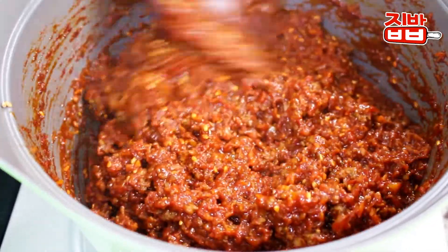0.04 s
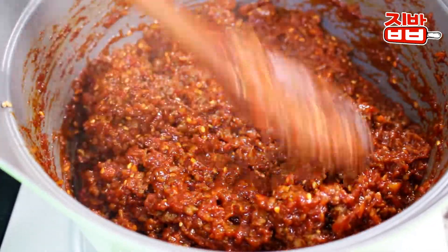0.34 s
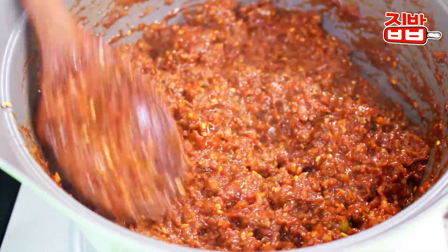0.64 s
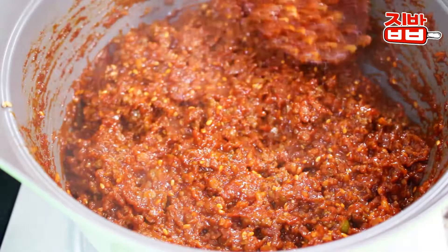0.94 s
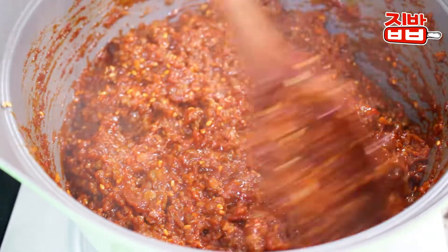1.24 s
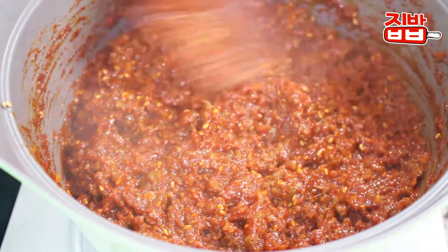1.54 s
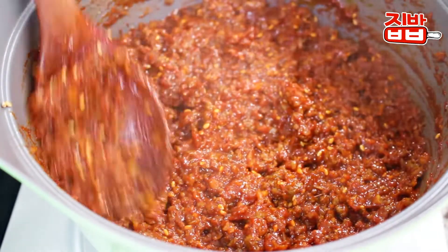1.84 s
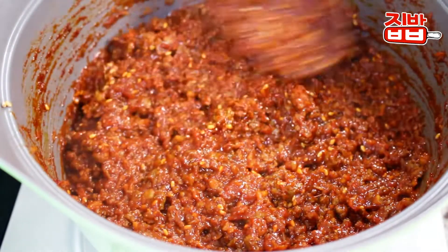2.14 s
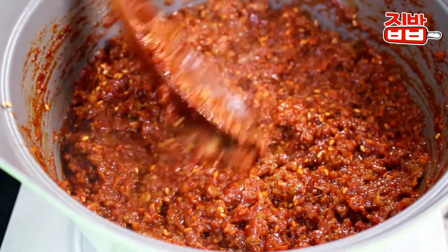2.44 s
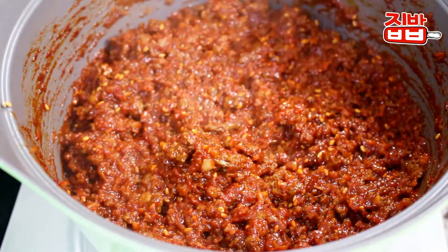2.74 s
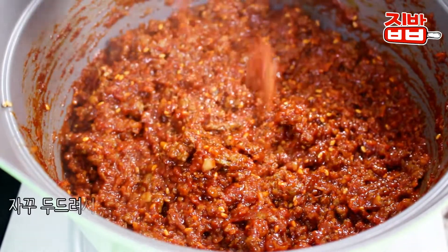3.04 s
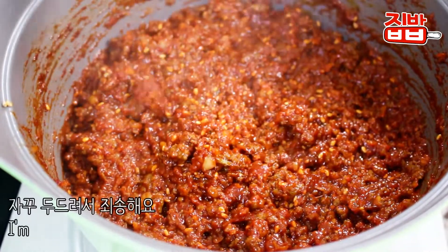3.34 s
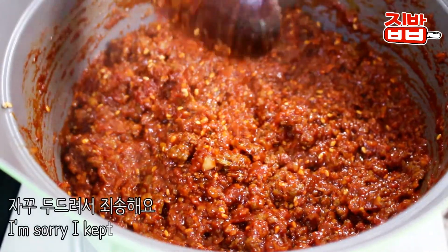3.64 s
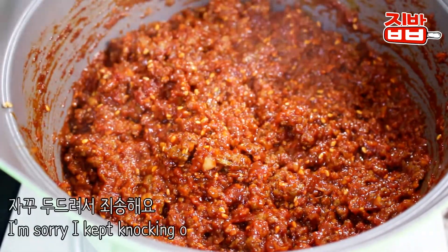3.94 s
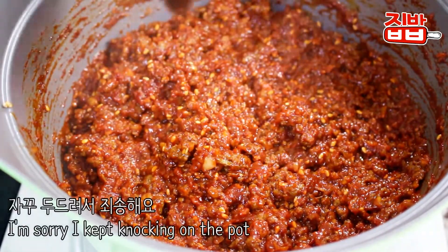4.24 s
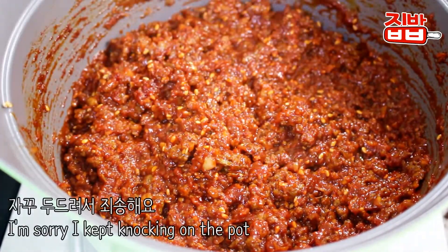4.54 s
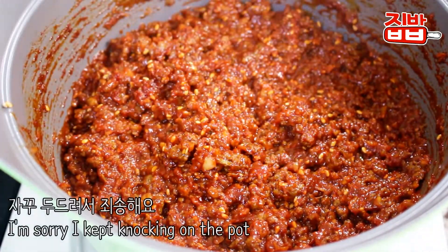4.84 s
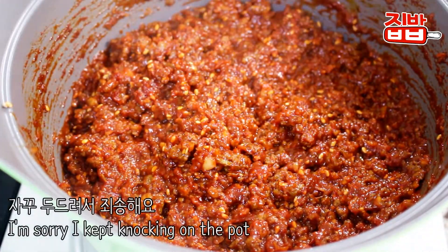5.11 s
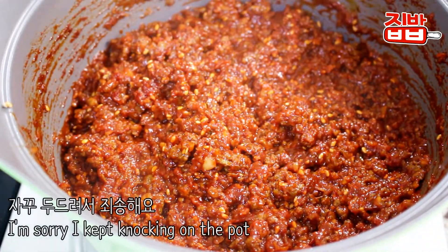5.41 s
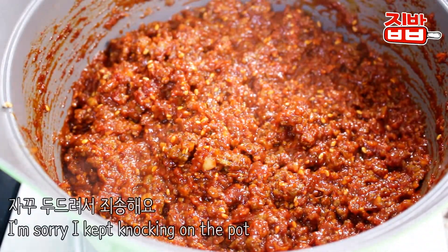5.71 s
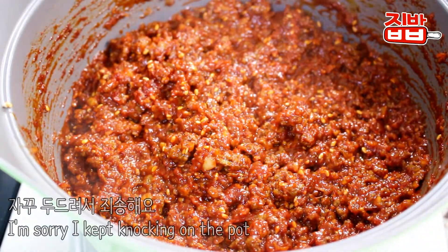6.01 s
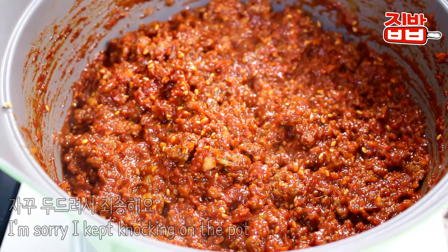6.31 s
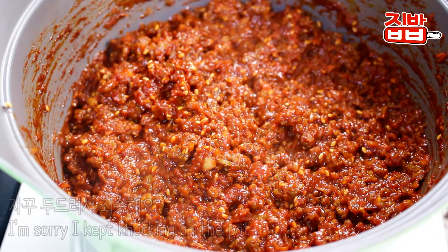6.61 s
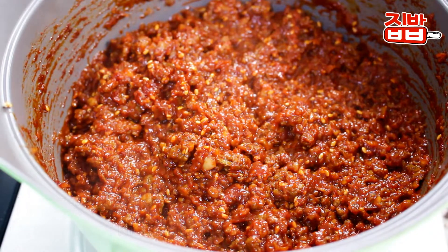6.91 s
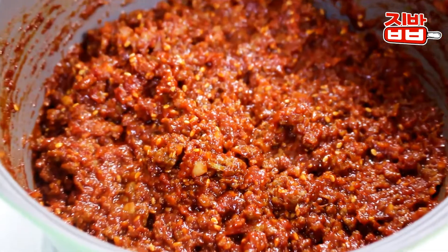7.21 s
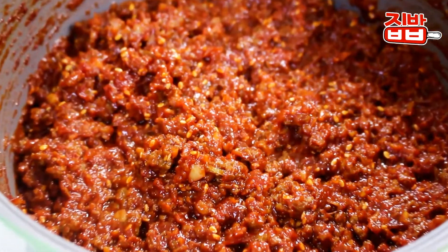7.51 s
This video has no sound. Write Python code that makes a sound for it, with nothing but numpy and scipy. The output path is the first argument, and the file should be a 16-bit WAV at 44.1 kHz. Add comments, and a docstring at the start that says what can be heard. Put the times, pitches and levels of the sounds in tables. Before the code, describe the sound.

Sticky stirring and hard wooden knocks on a metal pot in a kitchen, followed by a clack on a dish and knob clicks.

```python
"""A wooden spatula knocks on a metal pot: it bumps the wall while turning thick chili paste, then is
knocked clean on the rim. The paste crackles and pops; the pot hisses over a fluttering burner.
The spatula is laid on a dish, a stove knob clicks and something thumps near the microphone.
Each blow is a noisy clack plus decaying modes. The kitchen rings after it, over room air and a faint
monitor whine, and the hardest knocks overload the recorder."""
import sys
import numpy as np
from scipy import signal
from scipy.io import wavfile

SR = 44100
rng = np.random.default_rng(int(sys.argv[2]) if len(sys.argv) > 2 else 0)


def digitize_waveform(pressure):
    """Quantize a signal to 16-bit integers and store it at the path in sys.argv[1].

    Rows of a 2-D input are taken as channels; values are limited to [-1, 1].
    """
    field = np.atleast_2d(pressure).T
    bounded = np.clip(field, -1, 1)
    quanta = np.round(bounded * 32767).astype(np.int16)
    wavfile.write(sys.argv[1], SR, quanta)


N = 333396
TIME = np.arange(N) / SR


def amp(db):
    """Decibels to gain."""
    return 10 ** (np.asarray(db) / 20)


def unit_rms(x):
    """Scales to rms 1."""
    return x / np.sqrt(np.mean(x ** 2) + 1e-20)


def lookup(table, hz, column=1):
    """One table column, interpolated over log frequency."""
    columns = np.transpose(table)
    return np.interp(np.log(hz + 1), np.log(columns[0]), columns[column])


def add(mix, start_s, sound):
    """Mixes a sound in at start_s."""
    part = mix[max(round(start_s * SR), 0):][:len(sound)]
    part += sound[:len(part)]


def colour(x, db_at, size=4096):
    """Minimum-phase filter with gain db_at(hz)."""
    hz = abs(np.fft.fftfreq(size, 1 / SR))
    log_gain = np.log(amp(db_at(hz)) + 1e-6)
    response = np.exp(np.conj(signal.hilbert(log_gain)))
    taps = np.fft.ifft(response).real
    return signal.oaconvolve(x, taps[:size // 2])[:len(x)]


def bell(hz, centre_hz, octaves):
    """Resonance shape, 1 at its centre."""
    return 1 / (1 + (np.log2((hz + 1) / centre_hz) / octaves) ** 2)


def shelf(hz, corner_hz):
    """High shelf, 0 to 1."""
    return hz ** 2 / (hz ** 2 + corner_hz ** 2)


def noise_band(centre_hz, octaves, depth_db, samples=N):
    """Noise with one spectral peak, rms 1."""
    noise = rng.standard_normal(samples)
    return unit_rms(colour(noise, lambda hz: depth_db * bell(hz, centre_hz, octaves)))


def burst(t, t60_s):
    """Decaying noise of energy 1: many close, short-lived modes."""
    noise = rng.standard_normal(len(t)) * amp(-60 * t / t60_s)
    return noise / np.linalg.norm(noise)


def grains(per_s, spread_db):
    """Random clicks of very unequal size."""
    clicks = (rng.random(N) < per_s / SR) * rng.choice([-1, 1], N)
    return clicks * amp(spread_db * np.minimum(rng.exponential(1, N), 3))


def swell(start_s, end_s, db, rise_s, fade_db_per_s):
    """Gain that has risen by start_s, holds until end_s, then fades."""
    rise = np.clip(1 + (TIME - start_s) / rise_s, 0, 1)
    return rise * amp(db - fade_db_per_s * np.maximum(TIME - end_s, 0))


def mode(t, hz, db, t60_s):
    """One damped sine."""
    return amp(db - 60 * t / t60_s) * np.sin(2 * np.pi * hz * t)


def strike(modes, clack_eq, clack_db, clack_t60_s, impact, vary_db=1.5):
    """One blow: an impulse, a dense clack and clear modes whose weights vary with where it lands."""
    t = TIME[:SR]
    signs = (-1) ** np.arange(len(modes))
    weights = signs * amp(vary_db * rng.uniform(-1, 1, len(modes)))
    ring = sum(weight * mode(t, *row) for weight, row in zip(weights, modes))
    contact = impact * (t == 0) + burst(t, clack_t60_s)
    return ring + amp(clack_db) * colour(contact, lambda hz: lookup(clack_eq, hz))


def blows(hits, modes, clack_eq, clack_db, clack_t60_s, impact, clack_per_db=0):
    """Series of blows on one object; with clack_per_db, softer ones clack less against their ring."""
    out = np.zeros(N)
    for time_s, force_db, treble_db in hits:
        blow = strike(modes, clack_eq, clack_db + clack_per_db * force_db, clack_t60_s, impact)
        add(out, time_s, amp(force_db) * colour(blow, lambda hz: treble_db * shelf(hz, 2630)))
    return out


# kitchen reverberation (frequency [Hz], t60 [s], level [dB])
REVERB_BANDS = [(80, 0.65, 5), (250, 0.4, -3.5), (630, 0.75, 0.5), (2000, 0.58, 0), (5000, 0.54, -0.5),
                (9190, 0.58, -0.5), (14900, 0.18, -6.5)]

def kitchen(x, delay_s=0.0034, build_s=0.004):
    """Dense reflections build up quickly; each band decays at its own rate."""
    reflections = rng.standard_normal(SR) * (rng.random(SR) < 0.2)
    hz, t, bands = signal.stft(reflections, SR, nperseg=256)
    t60_s = lookup(REVERB_BANDS, hz)[:, None]
    band_db = lookup(REVERB_BANDS, hz, column=2)[:, None]
    bands = bands * amp(band_db - 60 * t / t60_s) / np.sqrt(t60_s)
    tail = signal.istft(bands, SR, nperseg=256)[1][:SR]
    tail *= 1 - np.exp(-np.maximum(TIME[:SR] - delay_s, 0) / build_s)
    return amp(-3) * signal.fftconvolve(x, tail / np.linalg.norm(tail))[:len(x)]


# room noise spectrum (frequency [Hz], level [dB])
AIR_EQ = [(15, -38), (25, -29), (64, -6), (134, -7), (277, -7.5), (545, -6.5), (677, -9.5), (936, -11),
          (1130, -11), (1520, -12.5), (2990, -17.5), (3720, -17.5), (4250, -18), (14800, -32), (16000, -9)]

def room_air():
    """Steady, dark noise, held flat above 14 kHz."""
    air = colour(rng.standard_normal(N), lambda hz: lookup(AIR_EQ, np.minimum(hz, 14000)), size=16384)
    return amp(-54) * unit_rms(air)


def monitor_whine(line_hz=15734):
    """Faint tone at a monitor's line frequency."""
    return amp(-66.5) * unit_rms(np.sin(2 * np.pi * line_hz * TIME))


def burner():
    """The flame's steady low flutter; it flares once."""
    flare = swell(start_s=5.94, end_s=6.43, db=-63.5, rise_s=0.91, fade_db_per_s=41.5)
    return (amp(-66) + flare) * noise_band(350, octaves=1.4, depth_db=50)


# spells of stronger hiss (start [s], end [s], level [dB])
HISS_SPELLS = [(0, 0.493, -69), (4.897, 5.6, -65)]

def pot_hiss():
    """The heated pot hisses thinly, swelling in spells."""
    spells = sum(swell(*spell, rise_s=0.4, fade_db_per_s=5.5) for spell in HISS_SPELLS)
    return (amp(-73.5) + spells) * noise_band(3720, octaves=0.17, depth_db=36)


# soft rubs (start [s], end [s], level [dB], centre [Hz])
SWISH_SPANS = [(5.003, 5.075, -52.5, 2960), (5.02, 5.104, -49, 1390), (5.85, 5.918, -51.5, 3330),
               (5.954, 6.129, -59, 4830)]

def swishes():
    """Brief rubbing noises before and after the spatula is laid down."""
    out = np.zeros(N)
    for start_s, end_s, db, hz in SWISH_SPANS:
        rub = noise_band(hz, octaves=1.1, depth_db=45, samples=round((end_s - start_s) * SR))
        add(out, start_s, amp(db) * rub * signal.windows.tukey(len(rub), 0.7))
    return out


# a touch, then the full weight (time [s], force [dB], treble [dB])
THUMP_HITS = [(7.0915, -8, -18), (7.096, -2, -1)]
# thump modes (frequency [Hz], level [dB], t60 [s])
THUMP_MODES = [(108, -33.5, 0.17), (340, -33, 0.026), (458, -31, 0.059), (1900, -26, 0.038)]
# thump contact spectrum (frequency [Hz], level [dB])
THUMP_EQ = [(30, -39), (90, -14), (400, 7), (900, -2), (1700, -5), (2300, -14), (5000, -20), (8000, -43)]

def dull_thump():
    """Something lands near the microphone and barely rings."""
    return blows(THUMP_HITS, THUMP_MODES, THUMP_EQ, clack_db=8, clack_t60_s=0.038, impact=0.4)


# knob clicks (time [s], force [dB], treble [dB])
KNOB_HITS = [(6.8405, -13, 3), (6.85, 0, -5.5), (6.989, -7.5, -21), (7.0145, -17.5, 5.5)]
# knob modes and a low room hum set off by the click (frequency [Hz], level [dB], t60 [s])
KNOB_AND_ROOM_MODES = [(151, -39, 0.36), (326, -49, 0.063), (561, -31, 0.11), (2300, -24, 0.018),
                       (2480, -20, 0.041), (2720, -40, 0.013)]
# knob clack spectrum (frequency [Hz], level [dB])
KNOB_EQ = [(35, -17), (150, 0), (600, 1), (1200, -5), (2500, 0.5), (3500, -11), (6000, -21), (12000, -64)]

def stove_knob():
    """The knob clicks in two quick pairs of small impacts."""
    return blows(KNOB_HITS, KNOB_AND_ROOM_MODES, KNOB_EQ, clack_db=8.5, clack_t60_s=0.14, impact=0.16)


# landing and bounces (time [s], force [dB], treble [dB])
DISH_HITS = [(5.1657, -0.5, 1.5), (5.2305, -6, -10.5), (5.4012, -19.5, -14.5)]
# dish modes and a low room hum set off by the landing (frequency [Hz], level [dB], t60 [s])
DISH_AND_ROOM_MODES = [(78.6, -45, 0.46), (158.1, -38.5, 0.73), (640, -27, 0.33), (734, -28, 0.27),
                       (1144, -18, 0.054), (1227, -15.5, 0.062), (1650, -20, 0.053), (2049, -9, 0.071),
                       (2790, -20, 0.091), (3830, -23, 0.15), (4960, -29.5, 0.17), (5070, -14, 0.028),
                       (6130, -37, 0.084), (6600, -46, 0.42), (7400, -41, .09), (7660, -42, 0.12),
                       (8780, -34, 0.071), (9216, -44, 0.16), (10240, -48, 0.1), (11700, -50, .08)]
# wood-on-dish clack spectrum (frequency [Hz], level [dB])
DISH_EQ = [(60, -21), (250, -17.5), (450, 0.5), (1100, 5), (1900, -0.5), (3000, -9), (5200, -13.5),
           (9000, -26.5), (15000, -60)]

def spatula_on_dish():
    """The spatula lands and bounces twice, ringing the dish and the room."""
    return blows(DISH_HITS, DISH_AND_ROOM_MODES, DISH_EQ,
                 clack_db=21.5, clack_t60_s=0.13, impact=0.36, clack_per_db=0.04)


# blade on the pot floor (start [s], end [s], level [dB])
DRAG_SPANS = [(0.875, 0.902, -50), (1.219, 1.311, -44), (1.321, 1.423, -46), (2.377, 2.472, -36.5)]
# friction spectrum (frequency [Hz], level [dB])
DRAG_EQ = [(88, -37), (150, -9.5), (228, -21), (356, 2.5), (435, -4), (477, 4.5), (794, -6), (913, 5),
           (1260, -10.5), (1360, -5.5), (6000, -19.5), (7800, -43.5), (13200, -120)]

def blade_drags():
    """Wood sticks and slips on the pot floor, muffled by the paste."""
    slips = grains(per_s=840, spread_db=3.5)
    rub = unit_rms(colour(slips, lambda hz: lookup(DRAG_EQ, hz)))
    out = np.zeros(N)
    for start_s, end_s, db in DRAG_SPANS:
        part = rub[(TIME > start_s) & (TIME < end_s)]
        add(out, start_s, amp(db) * part * signal.windows.tukey(len(part), 0.4))
    return out


# blade strokes through the paste (start [s], end [s], relative level [dB])
STROKE_SPANS = [(0.049, .19, -47), (.495, 0.55, -49.5), (0.818, 0.857, -45.5), (1.228, 1.555, -55),
                (1.958, 2.05, -49.5), (2.321, 2.46, -53)]
# crackle spectrum (frequency [Hz], level [dB])
SQUELCH_EQ = [(880, -40), (1500, -10), (1750, -1), (2160, -10), (3430, -9.5), (5450, -2), (12100, -15.5),
              (15000, -28)]

def paste_squelch():
    """Tiny films of paste snap at many pitches as the blade tears them, and settle when it stops."""
    envelope = sum(swell(*stroke, rise_s=0.014, fade_db_per_s=340) for stroke in STROKE_SPANS)
    crackle, t = np.zeros(N), TIME[:SR // 100]
    for hz in np.geomspace(2200, 13500, num=24):
        cycles = hz * t
        film = np.sin(2 * np.pi * cycles) * cycles * np.exp(-cycles / 1.6)
        snaps = signal.oaconvolve(grains(per_s=45, spread_db=5), film)[:N]
        crackle += amp(lookup(SQUELCH_EQ, hz)) * np.sqrt(hz) * unit_rms(snaps)
    return amp(-1) * envelope * unit_rms(crackle)


# largest air pockets (time [s], relative level [dB], pitch [Hz])
AIR_POCKETS = [(0.0276, -24, 4550), (0.084, -32, 10800), (.174, -36, 5240), (0.4101, -23.5, 4180),
               (0.427, -23.5, 4550), (0.4797, -25.5, 5700), (0.585, -25.5, 3200), (0.7564, -24, 4670),
               (0.816, -20, 2760), (0.8729, -23, 3680), (1.3467, -25, 5000), (1.4746, -16, 2820),
               (1.547, -27, 9000), (1.978, -27, 7440), (2.0278, -17.5, 5500), (2.046, -23, 5300),
               (2.371, -34, 7500), (5.7002, -25.5, 6430)]

def paste_pops(depth_db=34, octaves=0.8):
    """Each air pocket tears open with a short, sticky snap around its own pitch."""
    out, t = np.zeros(N), TIME[:SR // 20]
    for time_s, db, pitch_hz in AIR_POCKETS:
        tear = (t == 0) + 0.38 * burst(t, t60_s=0.0081)
        snap = colour(tear, lambda hz: depth_db * (bell(hz, pitch_hz, octaves) - 1))
        add(out, time_s, amp(db + 15.5) * snap)
    return out


# spatula on pot (time [s], force [dB], bass [dB], treble [dB], focus [Hz], focus lift [dB],
# wall ping [Hz], ping level [dB], rebound delay [s], relative rebound force [dB])
POT_HITS = [ (0.6458, -18.5, 4.5, 2, 1900, 7.5, 3827, -5.5, .014, -10),
            (1.738, -14.5, 2.5, -15.5, 540, 3, 349, -4.5, 0.011, -2),
            (1.8895, -18, 2, -3.5, 1900, 4.5, 3830, -19, 0.011, -4.5),
            (2.197, 0, -6, 2, 2260, 10.5, 3423, -12, 0.01, -26.5),
            (2.945, 1.5, -2, 0.5, 1788, 4, 538, -6, 0.063, -14.5),
            (3.1785, 0.5, -2, -5.5, 1300, 5, 520, -8.5, .0158, -9),
            (3.4042, 1, -3, -1.5, 940, 4, 4760, -19.5, .012, -9),
            (3.6521, 2, 0.5, 0.5, 1130, 3, 508, -14.5, .0134, -10)]
# paste-damped wall modes, faint rim tones, and the low lingering boom of counter and room
# (frequency [Hz], level [dB], t60 [s])
KNOCK_MODES = [(64.4, -48, 1.71), (86.5, -45.5, 0.93), (155, -37.5, 0.6), (195, -40.5, 0.71),
               (341.7, -21.5, .18), (497.6, -11.5, 0.064), (568, -5.5, 0.051), (560, -44.5, 1.6),
               (614, -32, 0.55), (714, -12, 0.053), (919.6, -12, 0.078), (1047, -10, 0.05),
               (1372, -17.5, .07), (1470, -15.5, 0.053), (1740, -35, .6), (1826, -12.5, 0.055),
               (2026, -23.5, 0.038), (2146, -14.5, 0.031), (2576, -20.5, 0.021), (3302, -16, 0.043),
               (4040, -29.5, 0.12), (5300, -13, 0.025), (5625, -26, 0.067), (6970, -21, 0.012),
               (7976, -25.5, 0.0068)]
# wood-on-pot clack spectrum (frequency [Hz], level [dB])
WOOD_EQ = [(50, -24), (130, -20.5), (260, -9.5), (480, 3.5), (750, 1), (1100, 2), (1900, 3), (3000, -4.5),
           (5300, -10), (8000, -20), (12000, -34.5), (16000, -49)]

def spatula_on_pot(knock_room_db=-6.5, rebound_room_db=-2):
    """Each knock rebounds once; the contact point colours both blows, and each rings the room anew."""
    out = np.zeros(N)
    for (time_s, force_db, bass_db, treble_db, focus_hz, lift_db,
         ping_hz, ping_db, rebound_s, rebound_db) in POT_HITS:
        def contact_db(hz):
            tilt_db = bass_db * (1 - shelf(hz, 710)) + treble_db * shelf(hz, 2800)
            return tilt_db + lift_db * bell(hz, focus_hz, octaves=0.185)

        ping = mode(TIME[:SR], ping_hz, ping_db, t60_s=0.06)
        knock = (time_s, force_db, knock_room_db)
        rebound = (time_s + rebound_s, force_db + rebound_db, rebound_room_db)
        for start_s, db, room_db in (knock, rebound):
            blow = strike(KNOCK_MODES, WOOD_EQ, clack_db=24, clack_t60_s=0.028, impact=0.9)
            blow = amp(db) * (colour(blow, contact_db) + ping)
            add(out, start_s, blow + amp(room_db) * kitchen(blow))
    return out


def scene():
    """Mono mix; the pot knocks bring their own reverberation and the background stays dry."""
    dish, knob, thump = spatula_on_dish(), stove_knob(), dull_thump()
    handling = paste_pops() + paste_squelch() + blade_drags() + swishes()
    reverb = kitchen(amp(-8) * (dish + knob) + amp(-19) * thump + amp(-6.5) * handling)
    knocks = spatula_on_pot()
    background = room_air() + pot_hiss() + burner() + monitor_whine()
    return (knocks + dish + knob + thump + handling + reverb + background)[None]


def record(dry, cutoff_hz=16500):
    """The hardest peaks clip flat; a low-pass limits the band."""
    clipped = np.clip(dry, -1, 1)
    lowpass = signal.firwin(255, cutoff_hz, window=("kaiser", 8), fs=SR)
    return signal.oaconvolve(clipped, lowpass[None], "same")


dry = scene()
out = record(dry)
digitize_waveform(out)
```